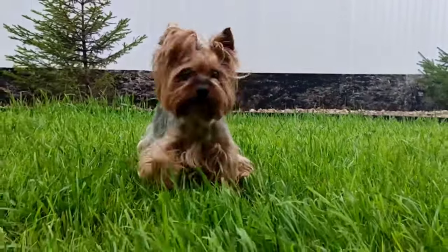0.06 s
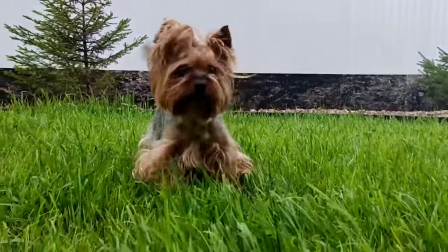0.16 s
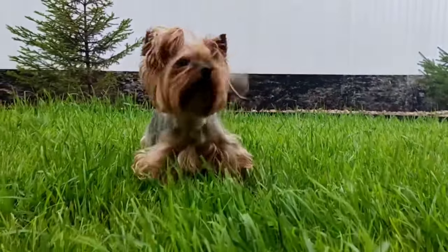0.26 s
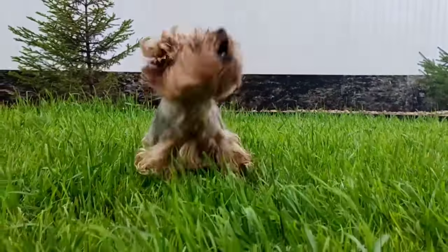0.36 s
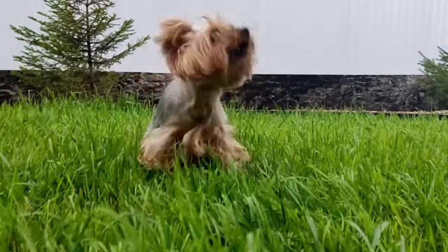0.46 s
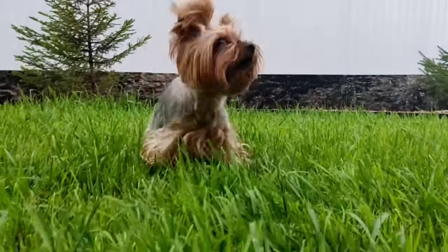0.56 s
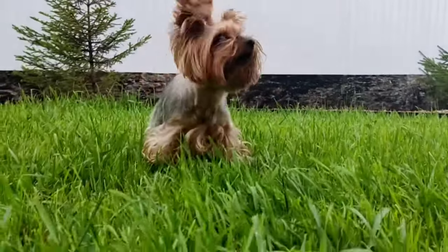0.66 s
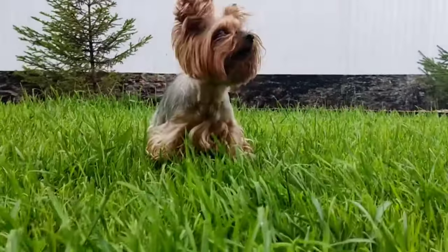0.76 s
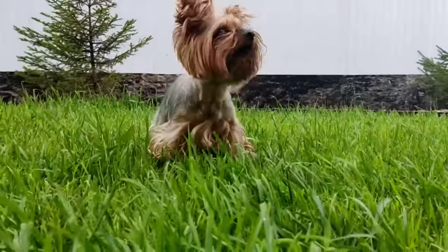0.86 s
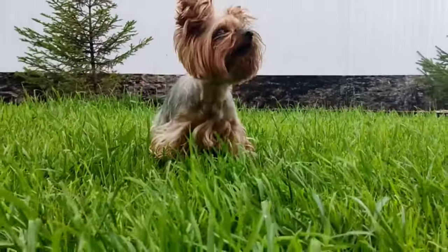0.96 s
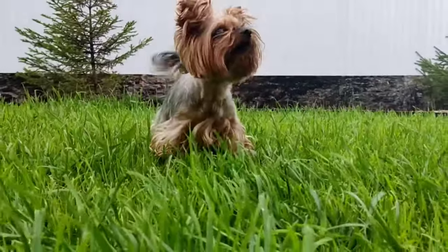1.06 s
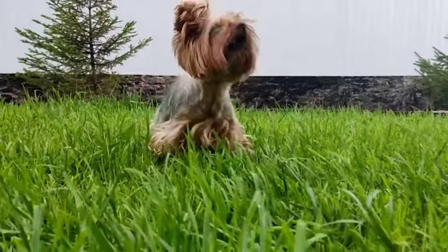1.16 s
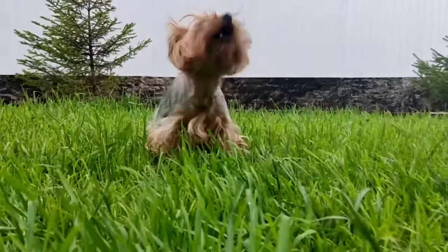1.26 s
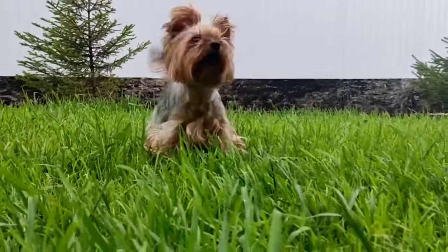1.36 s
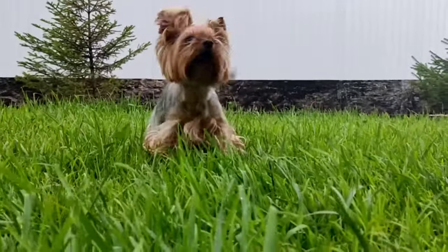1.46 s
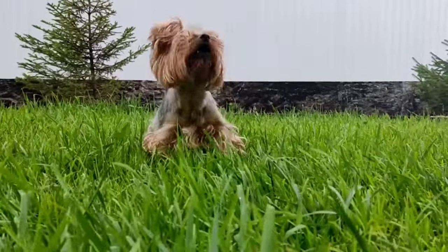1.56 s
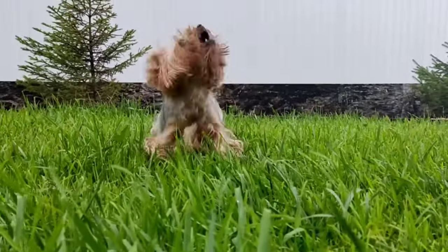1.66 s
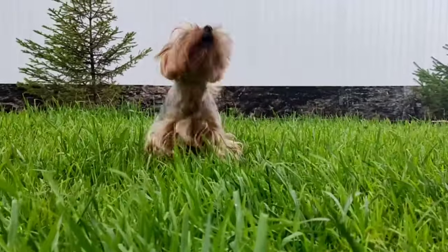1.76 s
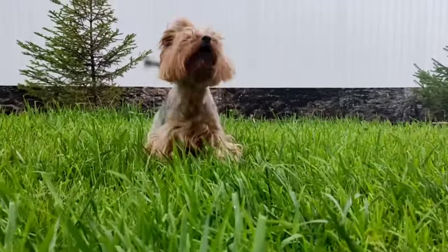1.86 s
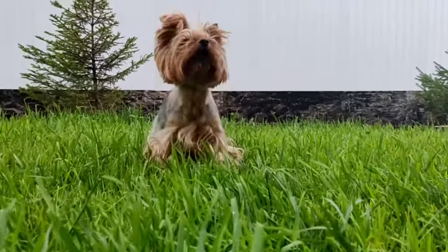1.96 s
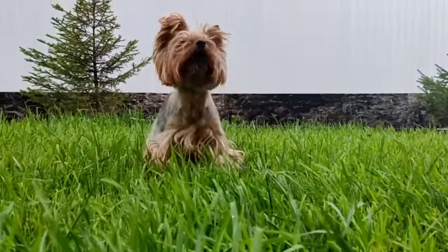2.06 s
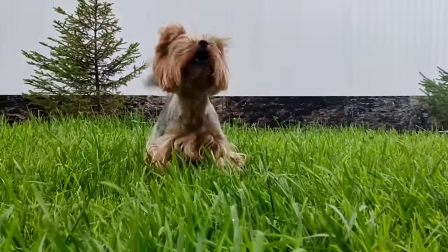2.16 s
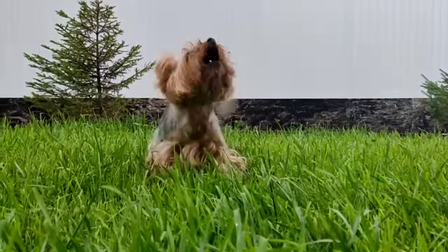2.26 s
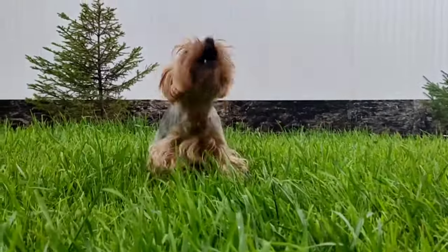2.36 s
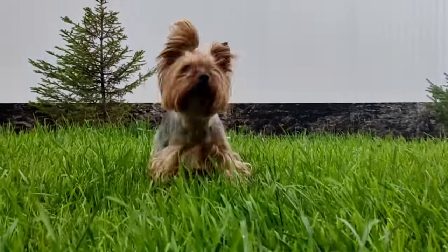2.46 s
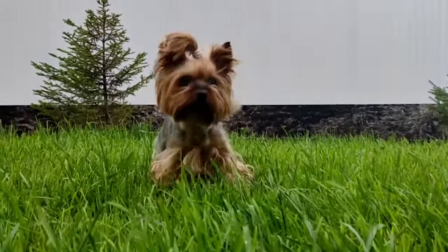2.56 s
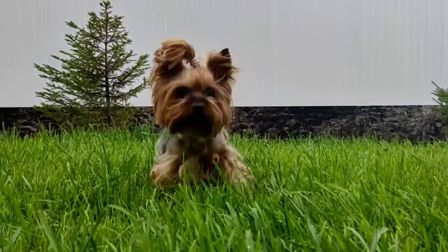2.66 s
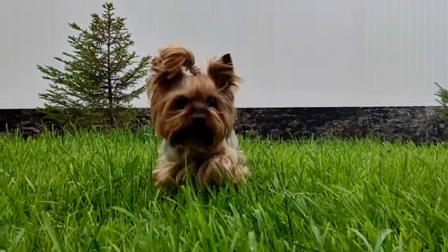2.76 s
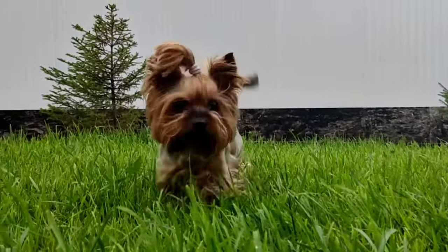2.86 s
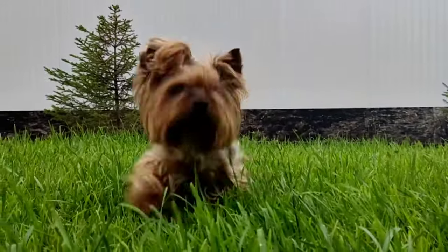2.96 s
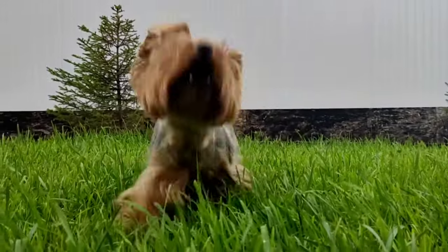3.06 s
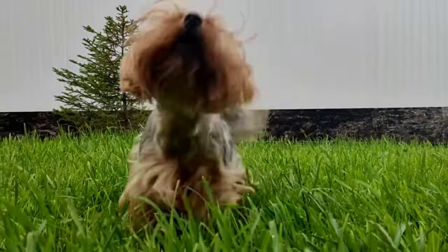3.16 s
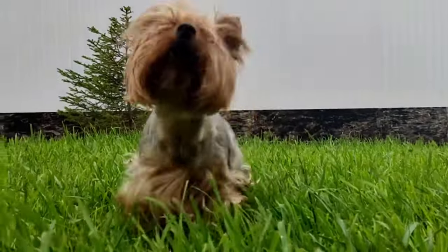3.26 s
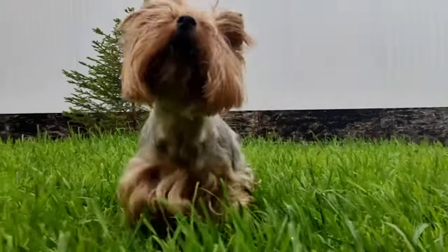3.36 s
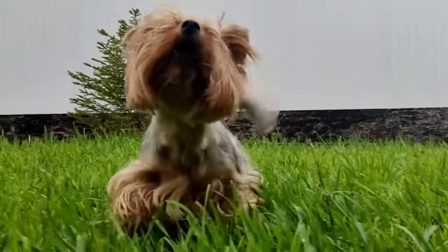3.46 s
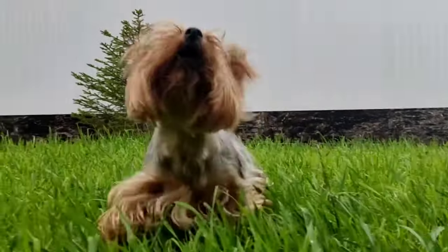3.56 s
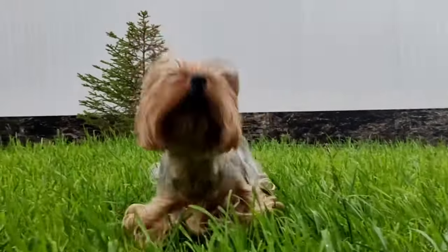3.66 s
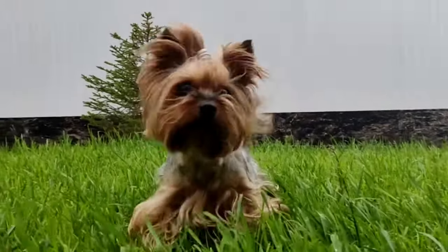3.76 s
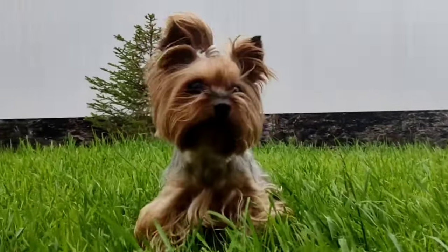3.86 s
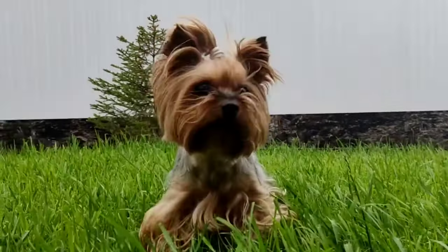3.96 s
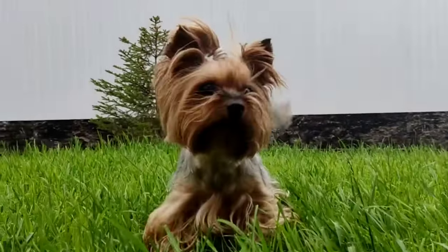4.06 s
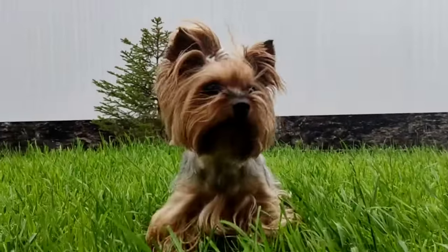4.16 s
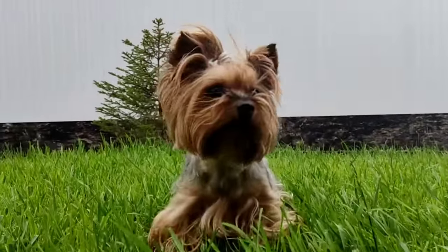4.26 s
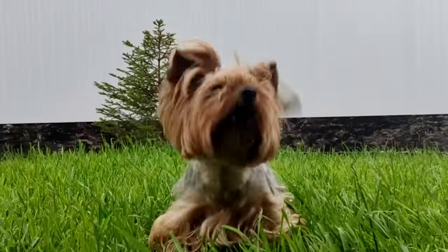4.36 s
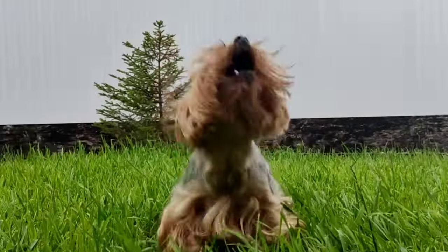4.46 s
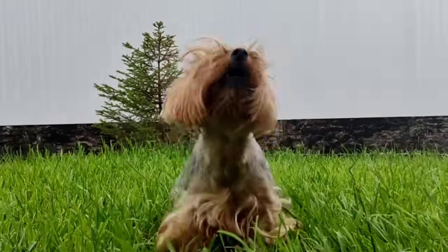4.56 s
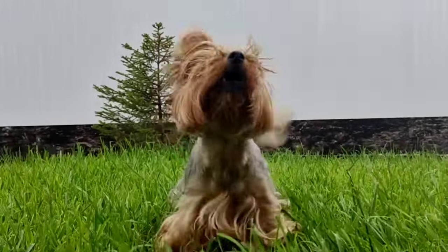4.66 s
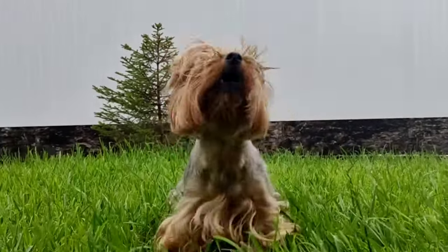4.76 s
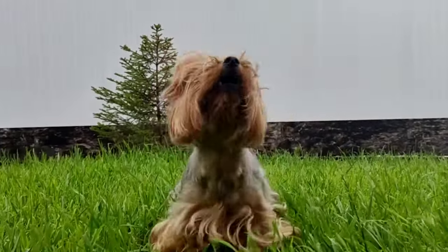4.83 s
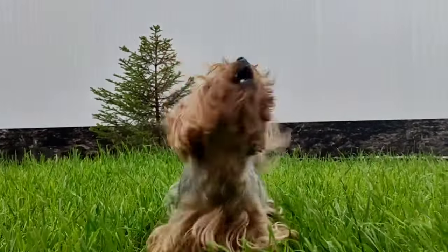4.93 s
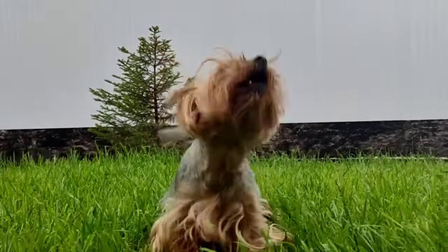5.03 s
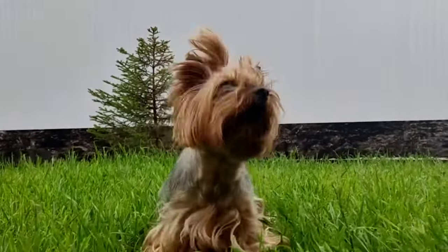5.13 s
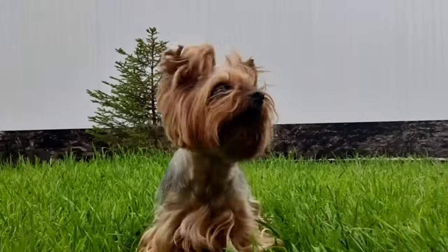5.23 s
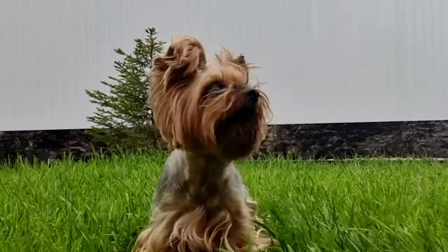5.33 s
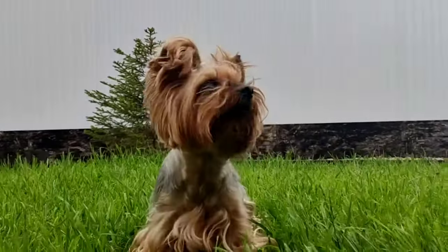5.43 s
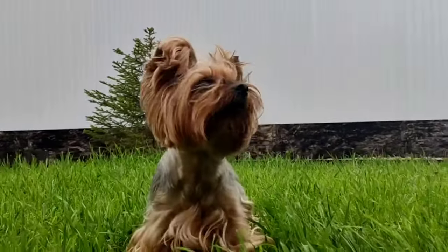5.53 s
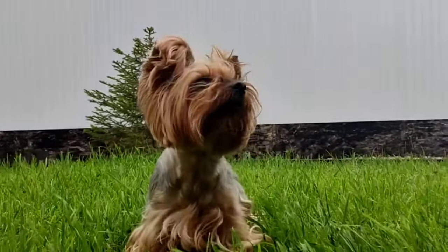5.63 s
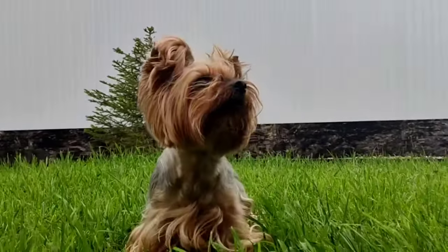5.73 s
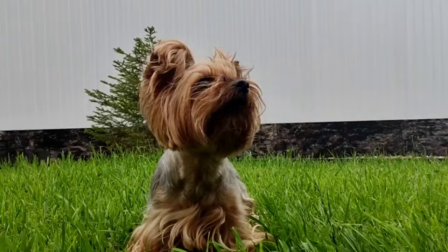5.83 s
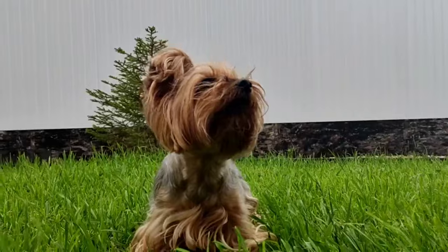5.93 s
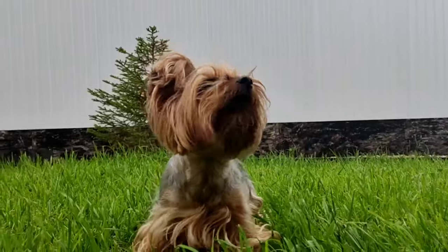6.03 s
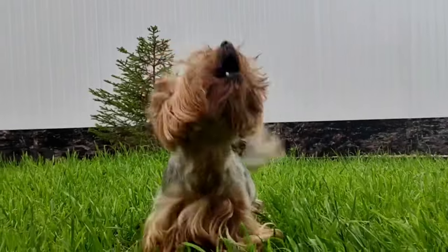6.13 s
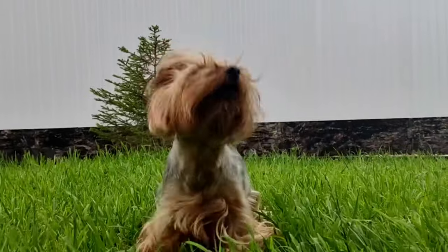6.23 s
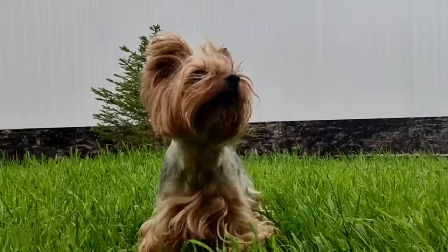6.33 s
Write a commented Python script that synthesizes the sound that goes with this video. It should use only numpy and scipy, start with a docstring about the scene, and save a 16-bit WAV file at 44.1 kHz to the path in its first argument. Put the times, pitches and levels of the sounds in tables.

```python
"""A small terrier on a lawn, close to a phone, huffs and grunts, then yaps; a faint echo follows each sound.
Paws thud and the mouth clicks between the first barks; each of the eight arches in pitch and turns rough.
A fluttering growl leads into the fourth bark; a second huff and stifled woofs come before the sixth.
Breaths, gusts and a distant hush run beneath; wind buffets the right port, strongest late on.
Vocal folds drive airway resonances; filtered noise makes breath, wind and garden."""
import sys
import numpy as np
from scipy import signal
from scipy.fft import rfft, irfft
from scipy.io import wavfile
from scipy.ndimage import uniform_filter1d

SR = 44100
rng = np.random.default_rng(int(sys.argv[2]) if len(sys.argv) > 2 else 0)


def put_to_file(sound):
    """Save the sound as 16-bit audio at rate SR, in the file named by the first command-line argument."""
    columns = np.atleast_2d(sound).T  # one column per channel
    safe = np.clip(columns, -1, 1)
    whole_steps = np.round(safe * 32767)
    wavfile.write(sys.argv[1], SR, whole_steps.astype(np.int16))


N = 281799
TIME = np.arange(N) / SR
CUT_HZ = 14380  # upper limit of voice harmonics and of the phone
# throat noise of huffs and woofs: freq_hz, level_db
HUFF_THROAT = [(59, -40.5), (100, -11), (407, -9.5), (599, -21.5), (881, -7), (1010, -21), (1340, -5),
               (1820, -22.5), (2520, -30.5), (3270, -76), (4000, -50.5), (5200, -70), (8800, -120)]


def amp(db):
    """Decibels to gain."""
    return 10 ** (np.asarray(db) / 20)


def unit(x):
    """Scales to rms 1."""
    return x / np.sqrt(np.mean(x ** 2) + 1e-20)


def steady(x, size=900):
    """Scales to a running rms of 1 over size samples."""
    return x / np.sqrt(abs(uniform_filter1d(x ** 2, size)) + 1e-20)


def read(table, hz):
    """Columns of a table, interpolated over log frequency."""
    f, *columns = np.transpose(table)
    return [np.interp(np.log(hz + 1), np.log(f + 1), c) for c in columns]


def add(mix, start_s, sound):
    """Mixes a sound in at start_s."""
    part = mix[max(round(start_s * SR), 0):][:len(sound)]
    part += sound[:len(part)]


def noise(colour, count):
    """Noise of rms 1 with a given spectrum."""
    db, = read(colour, np.fft.rfftfreq(N, 1 / SR))
    shaped = irfft(rfft(rng.standard_normal(N)) * amp(db), N)
    return unit(shaped[:count])


def wander(hz, count):
    """Low-passed noise of rms 1, for random modulation up to a given rate."""
    low_pass = signal.butter(2, hz, fs=SR, output="sos")
    return unit(signal.sosfilt(low_pass, rng.standard_normal(SR))[-count:])


def high_pass(x, hz):
    """Removes what lies below hz."""
    return signal.sosfilt(signal.butter(4, hz, "high", fs=SR, output="sos"), x)


def resonate(x, hz, width_hz):
    """A steep resonance that can follow a moving frequency: shift down, low-pass, shift back."""
    turn = np.exp(2j * np.pi * np.cumsum(hz * np.ones(len(x))) / SR)
    r = np.exp(-np.pi * width_hz / SR)
    low = signal.lfilter([(1 - r) ** 2], [1, -2 * r, r * r], x / turn)
    return 2 * (turn * low).real


def airway(x, modes):
    """A parallel set of resonances."""
    return sum(amp(db) * resonate(x, hz, width_hz) for hz, width_hz, db in modes)


def folds(hz, rough, doubling=0.95, leak=0.54):
    """Vocal folds: rough ones waver, alternate strong and weak pulses, and leak puffs of air."""
    rough, count = np.clip(rough, 0, 1), len(hz)
    jitter = .115 * rough * wander(170, count)
    turns = np.cumsum(hz * (1 + jitter)) / SR
    pulses = sum(np.cos(2 * np.pi * k * turns) * (k * hz < CUT_HZ) for k in range(1, 40))
    # half-rate term alternates the pulse strength
    shimmer = 1 + doubling * rough * np.cos(np.pi * turns) + 1.4 * rough * wander(200, count)
    puff_shape = 0.047 + np.exp(-(turns % 1) / 0.36)
    puffs = unit(puff_shape * rng.standard_normal(SR)[:count])
    voiced = (1 - rough) * pulses * np.sqrt(4 * hz / SR) * shimmer
    drive = voiced + rough ** leak * puffs
    return drive, puffs, np.cos(2 * np.pi * turns) * shimmer


def bark(start_s, length_s, effort_db, sag_db, attack_s, onset_db, release_s, start_hz, top_hz, end_hz,
         top_at, rise_bend, fall_bend, rough_top, rough_end, mouth_hz, chest_jaw_scale, chest_db, edge_db,
         rasp_db, rasp_hz, fizz_db, stretch=0.58, flicker_db=3):
    """The folds drive chest, mouth and upper resonances; rushing air rasps on top."""
    # airway resonances: freq_hz, width_hz, level_db
    chest_modes = [(477, 290, 2), (790, 480, 7)]
    edge_modes = [(2030, 660, -2), (2567, 290, 3), (2960, 160, -23.5)]
    rasp_modes = [(4850, 340, 0), (6240, 170, 3.5), (7260, 650, -1), (7975, 1800, -1.5),
                  (11040, 3200, -10.5), (13300, 950, -20.5)]
    # jaw gesture: share_of_bark (0-1), mouth_ratio, chest_db, edge_db, rasp_db
    jaw = [(0, 1, 1.5, -5, -0.5), (.13, 0.96, 3.5, -6.5, -1.5), (.26, 0.94, -1, -1, 4.5),
           (.42, 0.97, -0.5, 3, -1.5), (.62, 1.076, -2.5, 1, -1), (.83, 0.94, -0.5, -5, -4),
           (1, .9, -1.5, -8, 1)]
    attack_bend, release_bend, release_db = 0.9, 1.86, 27
    chest_follow, edge_follow, rasp_follow = 0.17, 0.86, 0.67  # share of swell_db each layer takes
    rough_onset, rough_clear, clear_at = .62, .22, .3  # gruff start, clearing early
    rest_rasp_hz = 6665

    t = np.arange(0, length_s, 1 / SR)
    count, share, top_at = len(t), t / length_s, np.clip(top_at, .4, .9)
    # effort swells, sags and fades
    swell_db = sag_db * (share - .5) - onset_db * np.maximum(1 - t / attack_s, 0) ** attack_bend
    swell_db -= release_db * np.maximum(1 - (length_s - t) / release_s, 0) ** release_bend
    # pitch makes one arch
    rising = np.maximum(1 - share / top_at, 0)
    falling = np.maximum((share - top_at) / (1 - top_at), 0)
    hz = top_hz * (start_hz / top_hz) ** (rising ** rise_bend) * (end_hz / top_hz) ** (falling ** fall_bend)
    rough = np.interp(share, [0, clear_at, .75 * top_at, top_at, (1 + top_at) / 2],
                      [rough_onset, rough_clear, .65 * rough_top, rough_top, rough_end])
    hz = hz * (1 + .07 * rough * wander(50, count))  # a strained voice cannot hold its arch
    drive, puffs, fundamental = folds(hz, rough)

    # the opening jaw shortens the airway and lifts its upper resonances
    at, *gesture = np.transpose(jaw)
    ratio, jaw_chest_db, jaw_edge_db, jaw_rasp_db = (np.interp(share, at, c) for c in gesture)
    opening = mouth_hz * ratio / 1470
    mouth = steady(high_pass(resonate(drive, mouth_hz * ratio, 380), 950), size=240)
    mouth *= amp(effort_db + swell_db + 1.3 * wander(42, count))

    # slack folds at low pitch give a round, strong fundamental
    slack = np.interp(hz, [420, 720], [3, .2]) * (1 - np.clip(rough, 0, 1))
    chest = steady(high_pass(airway(drive, chest_modes), 210))
    chest = steady(chest + slack * fundamental)
    chest *= amp(chest_db + chest_jaw_scale * jaw_chest_db + chest_follow * swell_db)

    moved_edge = [(f * opening ** 0.36, w, db) for f, w, db in edge_modes]
    edge = steady(airway(drive + 0.33 * rough * puffs, moved_edge))
    edge *= amp(effort_db + edge_db + jaw_edge_db + edge_follow * swell_db)

    # turbulence feeds each high resonance unevenly; the highest ones fizz
    rasp_shift = rasp_hz / rest_rasp_hz * ratio ** stretch
    jet = [(f * rasp_shift, w, db + fizz_db * (f > 9500) + flicker_db * wander(21, count))
           for f, w, db in rasp_modes]
    rasp = steady(high_pass(airway(puffs + drive, jet), 2900))
    rasp *= amp(effort_db + rasp_db + jaw_rasp_db + rasp_follow * swell_db + 1.1 * wander(36, count))
    rasp *= amp(2.5 * np.exp(-((share - 0.27) / 0.053) ** 2))  # flares 2.5 dB as the jaws part

    shudder = 1 + 0.29 * np.sqrt(np.clip(rough, 0, 1)) * wander(150, count)
    return start_s, shudder * (mouth + chest + edge + rasp) * signal.windows.tukey(count, .03)


def trail(bark_end_s, fizz_db, colour, level_db=-41, decay_s=0.034):
    """Air still rushes out after the folds stop, most after a fizzy bark."""
    t = np.arange(6000) / SR
    gain = amp(level_db + 0.98 * fizz_db)
    return bark_end_s - .004, gain * noise(colour, len(t)) * np.exp(-t / decay_s)


def growl(start_s, length_s, level_db, swell_db, start_hz, end_hz, depth, flutter_hz=23.7, crest_s=1.99):
    """A low hoarse voice, chopped by the flapping soft palate."""
    # throat resonances: freq_hz, width_hz, level_db
    throat = [(210.2, 280, 5), (840, 650, -7.5), (1580, 380, -4), (2220, 400, -14.5), (2945, 130, -5.5),
              (6240, 3600, -25)]
    t = np.arange(0, length_s, 1 / SR)
    share = t / length_s
    drive, puffs, _ = folds(start_hz + (end_hz - start_hz) * share, 0.21 + 0.47 * depth)
    low = airway(drive, throat[:1])
    upper = airway(.5 * drive + 0.42 * puffs, throat[1:])
    voice = steady(high_pass(low + upper, 110))
    flap = np.tanh(2.9 * np.cos(2 * np.pi * flutter_hz * (start_s + t - crest_s)))
    flutter = unit(1 + np.clip(depth, 0, .95) * flap)
    fade = signal.windows.tukey(len(t), 0.16)
    return start_s, amp(level_db + swell_db * (share - .5)) * flutter * voice * fade


def huff(crest_s, rise_s, level_db, decay_s=.027, throat_db=-12.5):
    """A blast through the nose that swells and dies away, with some noise from the throat."""
    # nose noise: freq_hz, level_db
    nose = [(1000, -19.5), (2000, 0), (2900, -10.5), (4100, 4.5), (5500, -7), (7200, -8), (9500, -3.5),
            (12000, -7), (14500, -14.5)]
    t = np.arange(max(crest_s - rise_s, 0), crest_s + 0.093, 1 / SR) - crest_s
    swell = np.minimum(1 + t / rise_s, np.exp(-t / decay_s))
    air = noise(nose, len(t)) + amp(throat_db) * noise(HUFF_THROAT, len(t))
    return crest_s + t[0], amp(level_db) * swell * air


def woof(start_s, length_s, level_db):
    """A short push of air through the throat, behind closed lips."""
    count = int(length_s * SR)
    return start_s, amp(level_db) * noise(HUFF_THROAT, count) * signal.windows.tukey(count, .3)


def sniff(centre_s, length_s, level_db, colour):
    """Drawn air: coloured noise that fades in and out."""
    count = int(length_s * SR)
    return centre_s - length_s / 2, amp(level_db) * noise(colour, count) * signal.windows.tukey(count, .8)


def click(start_s, level_db, pitch_hz, snap_db):
    """A wet click of the mouth: a brief decaying ring plus a noise snap."""
    t = np.arange(6000) / SR
    ring = np.sin(2 * np.pi * pitch_hz * t) * np.exp(-t * pitch_hz / 3)
    snap = amp(snap_db) * rng.standard_normal(len(t)) * np.exp(-t / 0.0012)
    return start_s, amp(level_db) * (ring + snap)


def dog():
    """Everything that comes from the dog's head, as one signal."""
    # start_s, length_s, effort_db, sag_db, attack_s, onset_db, release_s, start_hz, top_hz, end_hz,
    # top_at (0-1), rise_bend, fall_bend (1 = even), rough_top (0-1), rough_end (0-1), mouth_hz,
    # chest_jaw_scale (1 = table), chest_db, edge_db (re effort), rasp_db (re effort), rasp_hz,
    # fizz_db (re rasp)
    bark_rows = [(0.391, 0.17, -11, 3.5, 0.054, 6.5, 0.042, 225.2, 756.7, 563.4, 0.54, 2.76, 1.8, .5, .7, 1488, 0.88, -28.5, -12, -21, 6650, -1.5),
                 (1.199, .174, -13, -6.5, 0.056, 17, 0.038, 242, 798.3, 482.4, .68, 2.8, 2.9, 0.62, .6, 1502, .6, -27, -9.5, -18, 6500, -1.5),
                 (1.678, 0.19, -16.5, -1.5, 0.05, 16, .075, 260.3, 632.7, 216.7, .5, 2.2, 1.6, .55, 0.11, 1630, 0.26, -27, -7.5, -20.5, 6490, -4.5),
                 (2.248, 0.24, -14.5, 5, 0.071, 24, 0.11, 245.5, 817, 193.9, 0.59, 1.89, 1.3, 0.76, 0.031, 1597, 0.35, -26, -4, -16, 6700, -10.5),
                 (3.065, .19, -14, 0, 0.027, 22.6, .034, 293.2, 1023, 524, .74, 1.57, 2.6, 0.72, .35, 1440, 3.1, -29, -11.5, -17, 6900, 6.5),
                 (4.433, .18, -11.5, -3, .035, 14, 0.038, 262.5, 802, 488, .7, 2.5, 2.6, .55, .5, 1467, 1.4, -30, -12, -19.5, 6562, 1.5),
                 (4.95, 0.19, -12, -3, 0.075, 8.4, .032, 281.1, 653.5, 243.7, 0.61, 1.81, 1.5, .5, 0.018, 1443, 0.24, -28, -13.5, -24, 6670, 1.5),
                 (6.103, 0.18, -13, -3, 0.032, 30.5, 0.021, 258.5, 1000, 683.5, 0.61, 1.6, 2.6, .7, 0.31, 1428, 2.2, -31, -13.5, -22.5, 6270, 5.5)]
    # growls and grunts: start_s, length_s, level_db, swell_db, start_hz, end_hz, flutter_depth (0-1)
    growl_rows = [(0, .085, -36.5, -9, 227.5, 169.9, 0.2), (1.857, .11, -41.5, 3.5, 217.6, 209.6, 0.2),
                  (1.971, 0.22, -42.5, 1, 200.7, 204.3, 0.7), (2.184, .1, -35, 6, 213, 281.3, .5),
                  (3.714, .065, -36.5, -4, 290.3, 260.2, .35), (3.775, .065, -38, -5.5, 233.5, 155, 0.2),
                  (5.136, 0.059, -39.5, 1, 235, 223.8, .2), (5.194, .1, -38, -11, 262, 193.8, 0.1)]
    # mouth-shut nose blasts: crest_s, rise_s, level_db
    huff_rows = [(0.033, 0.055, -26.5), (3.775, 0.045, -27.5)]
    # stifled woofs: start_s, length_s, level_db
    woof_rows = [(0.029, 0.008, -28.5), (3.712, 0.043, -22.5), (3.78, 0.0071, -26), (3.789, 0.0064, -33.5)]
    # drawn breaths: centre_s, length_s, level_db
    sniff_rows = [(0.285, 0.25, -53), (1.406, 0.09, -40), (1.61, 0.044, -38.5), (2.899, 0.26, -53.5),
                  (3.405, 0.29, -51.5), (4.816, 0.35, -49), (5.194, 0.15, -51.5)]
    # breath noise: freq_hz, level_db
    breath_colour = [(1000, -23.5), (1700, 1), (2900, -9), (4000, 0), (6000, -12), (7500, -6),
                     (10000, -5.5), (14000, -16)]
    # mouth clicks: start_s, level_db, pitch_hz, snap_db (re ring)
    click_rows = [(0.326, -28.5, 1952, -14), (0.619, -38.5, 2700, 5), (0.881, -34.5, 4000, 2),
                  (1.088, -33.5, 2031, -6), (1.527, -24, 1919, -8.5), (1.582, -22, 1950, -0.5),
                  (1.666, -35, 2005, 1), (2.049, -44.5, 1505, -3), (2.186, -27, 2086, 2),
                  (3.429, -27.5, 2200, -13), (3.612, -37.5, 1840, -3), (5.387, -40.5, 1170, -3.5)]
    out = np.zeros(N)
    for source, table in ((bark, bark_rows), (growl, growl_rows), (huff, huff_rows),
                          (woof, woof_rows), (click, click_rows)):
        for row in table:
            add(out, *source(*row))
    for start_s, length_s, *_, fizz_db in bark_rows:
        add(out, *trail(start_s + length_s, fizz_db, breath_colour))
    for row in sniff_rows:
        add(out, *sniff(*row, breath_colour))
    return out


def echo(x, early_db=-11, late_db=-25, early_s=0.0096):
    """Quick scatter from the ground and the phone's holder, then a thin tail from fence and trees."""
    # late tail: freq_hz, t60_s, level_db (relative)
    tail = [(200, 1, -14.5), (696, 0.23, 16), (1500, 0.66, -11.5), (2780, 0.65, -2), (6000, 0.82, -2.5),
            (14100, 1, -10.5)]
    t = np.arange(SR) / SR
    signs = rng.choice([-1., 1.], (2, 2, SR))
    taps = signs * (rng.random((2, 2, SR)) < 2000 / SR) * (t > .002)  # about 2000 taps per second
    early = taps[0] * np.exp(-t / early_s)
    hz, age_s, z = signal.stft(taps[1] * (t > .015), SR, nperseg=256)
    t60_s, db = read(tail, hz)
    decay = amp(db[:, None] - 60 * age_s / t60_s[:, None])
    late = signal.istft(z * decay, SR, nperseg=256)[1][:, :SR]
    response = (amp(early_db) * unit(early) + amp(late_db) * unit(late)) / np.sqrt(SR)
    return signal.fftconvolve(x[None], response, axes=1)[:, :N]


def surroundings(x, count=3, turn_hz=.6):
    """As the head turns, the reflections blend from one pattern into the next, in a cycle."""
    shares = np.array([np.maximum(np.cos(2 * np.pi * (turn_hz * TIME + k / count)), 0) for k in range(count)])
    shares /= np.linalg.norm(shares, axis=0)
    return sum(echo(x * share) for share in shares)


def ports(x):
    """Two microphone ports: the left lags above about 1.1 kHz and is shaded in the treble."""
    # port response: freq_hz, left_phase_lead_rad, left_db, right_db
    response = [(186, 0.02, -7, -7.5), (650, 0.54, -1, 1), (1026, 0.7, -2.5, -1), (1333, -1.24, 1.5, -0.5),
                (1456, -1.64, 0.5, -3), (2075.7, -2.5, 1, 1), (2082.3, -3.5, 3, 2), (2464, -5, 2, 2),
                (2484.6, -7, -0.5, -1.5), (4070, -9, -4.5, -5), (6090, -12.5, 3, 2.5),
                (7590, -15.5, -9, 5.5), (8700, -14.5, -31, -2), (10660, -18.5, -17, -3.5),
                (14000, -27.5, -7.5, -7)]
    hz = np.fft.rfftfreq(N, 1 / SR)
    phase, left_db, right_db = read(response, hz)
    return irfft(rfft(x) * np.array([amp(left_db) * np.exp(1j * phase), amp(right_db)]), N)


def thuds():
    """Paws and soft knocks: dull pushes on the turf, with no ring."""
    # start_s, peak_db (approx), pulse_width_s
    thud_rows = [(.742, -18, 0.00052), (0.808, -31.5, 0.00042), (1.394, -25.5, 0.00059),
                 (1.495, -19.5, 0.00053), (1.529, -32, .0006)]
    out, t = np.zeros(N), np.arange(2000) / SR
    for start_s, peak_db, width_s in thud_rows:
        u = t / width_s
        add(out, start_s, amp(peak_db) * 2 * u * (2 - u) * np.exp(-u))
    return out


def wind():
    """Eddies rumble at each port separately; single buffets strike the right one."""
    # rumble spectrum: freq_hz, level_db
    rumble_colour = [(8.8, -26.5), (15, 7), (102, -8), (201, -20), (257, -29.5), (483, -48), (530, -44),
                     (600, -42.5), (780, -71), (1320, -120)]
    # breeze, freshening late on: time_s, level_db
    breeze = [(0, -48.5), (2.5, -50.5), (5.1, -49.5), (5.7, -38), (6.39, -38)]
    # gusts: crest_s, length_s, level_db, left_minus_right_db
    gusts = [(.01, 0.13, -50, 16), (0.77, 0.13, -49, 20), (1.508, 0.13, -37, 10), (2.304, .1, -42, -19),
             (3.02, .14, -34, -34), (3.696, 0.17, -48, -7.5), (4.131, 0.081, -36.5, -18.5),
             (4.736, 0.16, -37.5, -20), (5.747, 0.47, -34, -14), (6.06, 0.32, -34.5, -15)]
    # buffets: centre_s, length_s, level_db, top_hz (nominal)
    buffets = [(2.717, 0.056, -39.5, 89), (3.02, .11, -39.5, 107.6), (4.136, 0.07, -36.5, 112),
               (5.637, 0.025, -29, 163.4), (5.724, .08, -26, 191.6), (6.053, 0.1, -30, 159.4)]

    def shared(pan_db):
        """The two ports share the wind's power; pan_db is left minus right."""
        power = np.array([[amp(pan_db)], [amp(-pan_db)]])
        return power / power.mean()

    power = amp(np.interp(TIME, *np.transpose(breeze))) ** 2 * shared(-4)
    for crest_s, length_s, db, pan_db in gusts:
        swell = np.exp(-(np.pi * (TIME - crest_s) / length_s) ** 2)
        power = power + amp(db) ** 2 * shared(pan_db) * swell
    out = np.sqrt(power) * np.array([noise(rumble_colour, N) for _ in range(2)])
    for centre_s, length_s, db, top_hz in buffets:
        count = int(length_s * SR)
        low_pass = signal.butter(2, 0.83 * top_hz, fs=SR, output="sos")
        eddy = signal.sosfilt(low_pass, high_pass(wander(top_hz, SR), 52.4))
        add(out[1], centre_s - length_s / 2, amp(db) * unit(eddy[-count:] * np.hanning(count)))
    return out


def garden(level_db=-54):
    """Distant outdoor hush: noise partly common to both ports, partly separate."""
    # hush spectrum: freq_hz, level_db
    hush_colour = [(71, -34), (120, -10.5), (210, -7), (268, -9.5), (302, -12.5), (551, -15), (760, -15.5),
                   (1180, -25), (1530, -22), (3220, -33.5), (4180, -33), (9520, -31), (14500, -35.5)]
    common = noise(hush_colour, N)
    return amp(level_db) * np.array([0.64 * common + 0.86 * noise(hush_colour, N) for _ in range(2)])


def scene():
    """The dog with its echo and thuds, over wind and garden."""
    voice = dog()
    return ports(voice + surroundings(voice)) + thuds() + wind() + garden()


def record(dry):
    """The phone rounds off the highest peaks and limits the band."""
    rounded = dry / (1 + (dry / .95) ** 8) ** (1 / 8)
    low_pass = signal.firwin(1023, CUT_HZ, window=("kaiser", 9), fs=SR)
    return signal.oaconvolve(rounded, low_pass[None], "same")


dry = scene()
out = record(dry)
put_to_file(out)
```